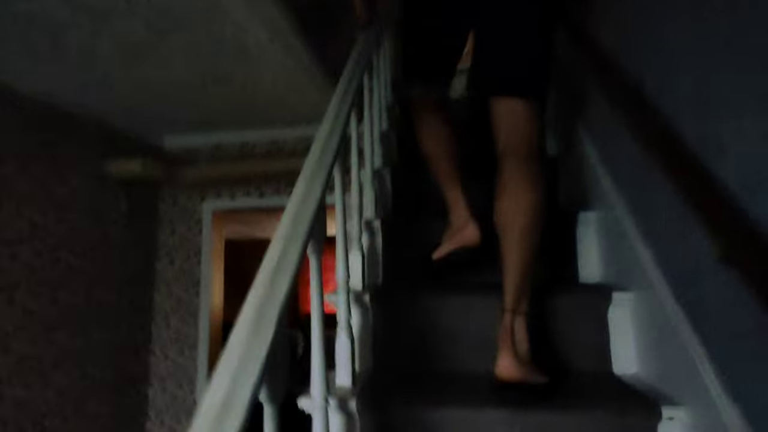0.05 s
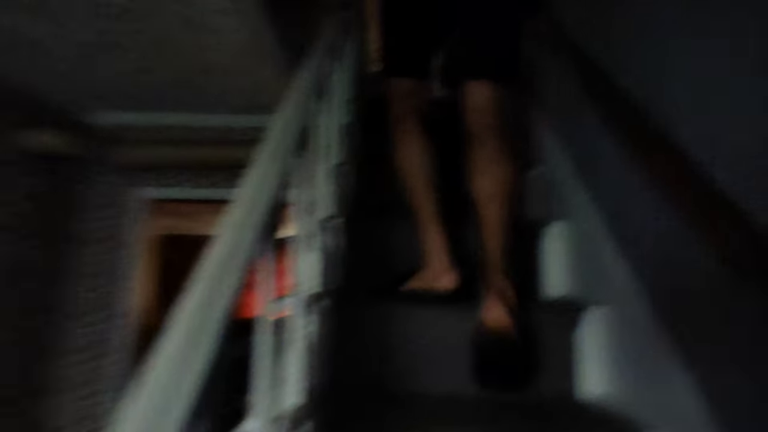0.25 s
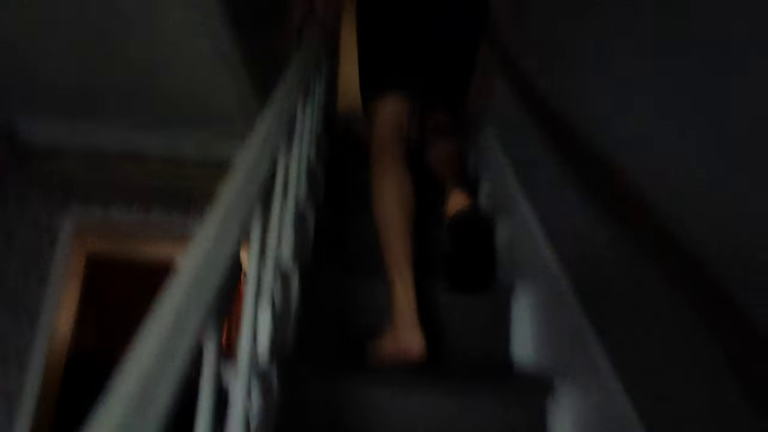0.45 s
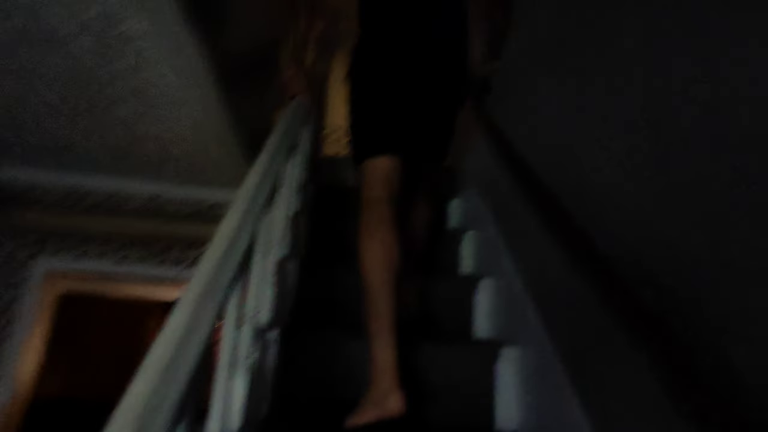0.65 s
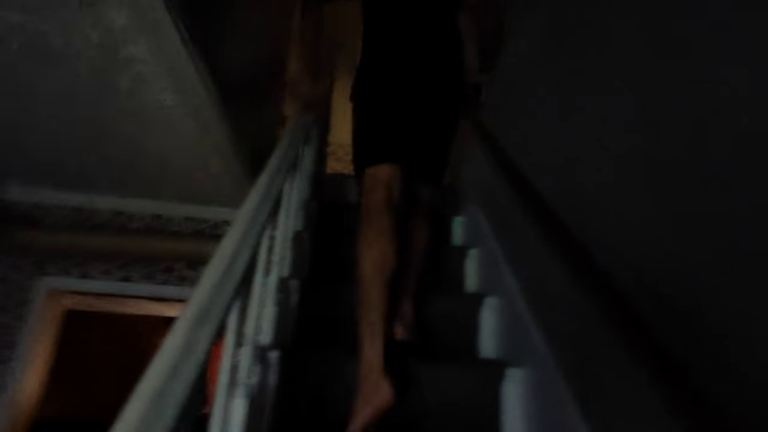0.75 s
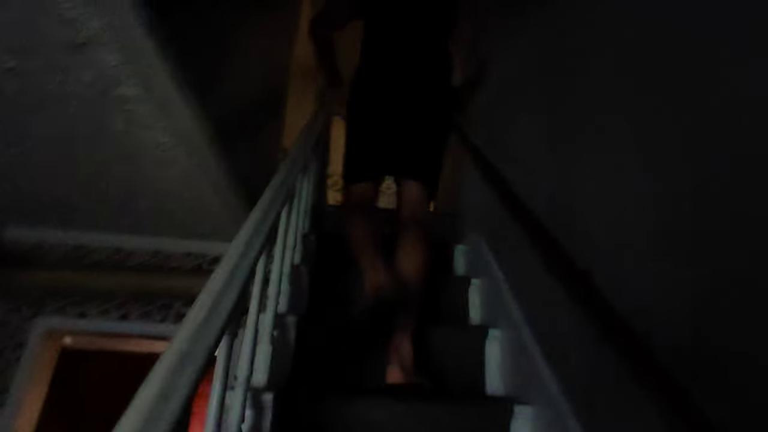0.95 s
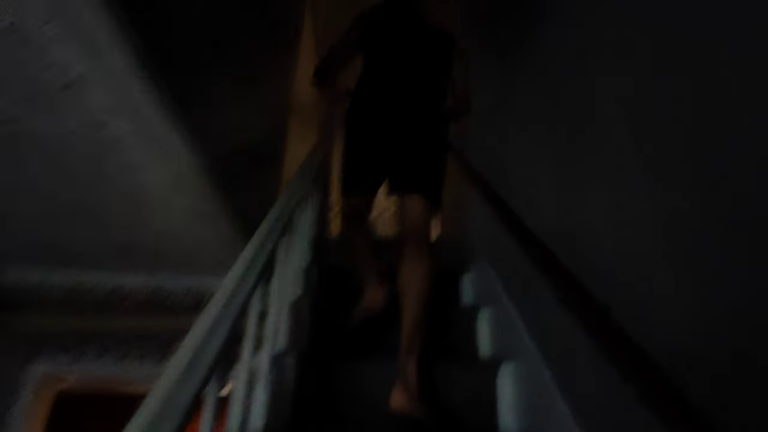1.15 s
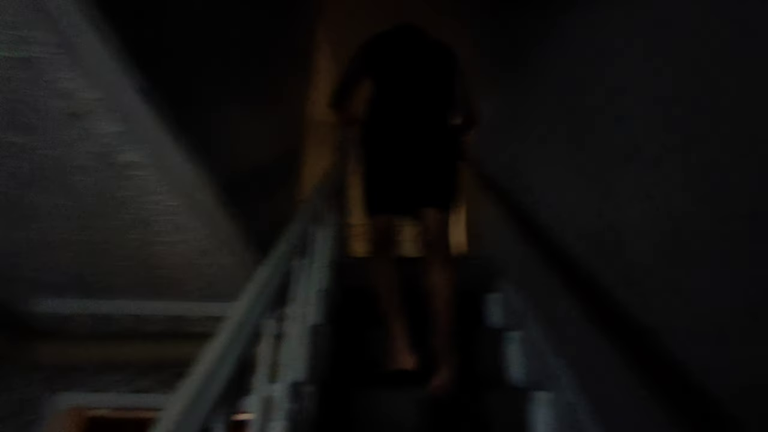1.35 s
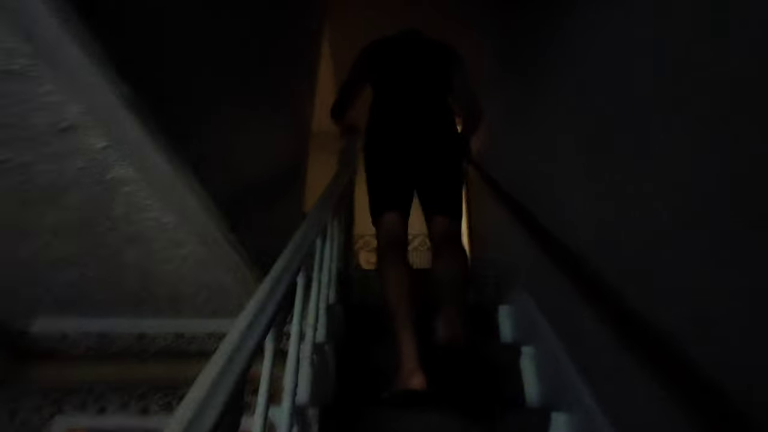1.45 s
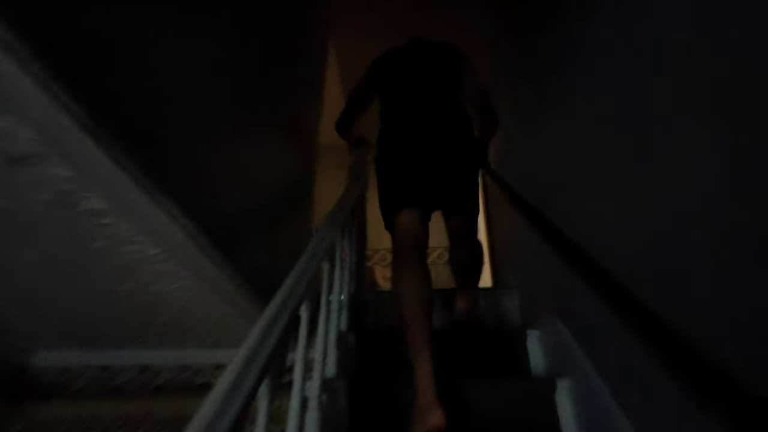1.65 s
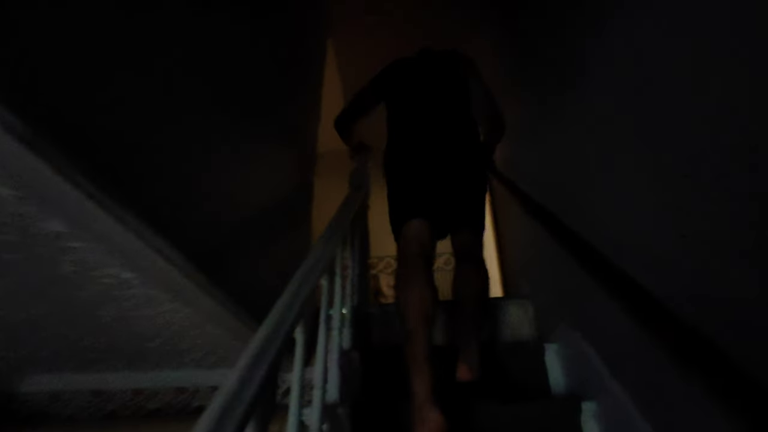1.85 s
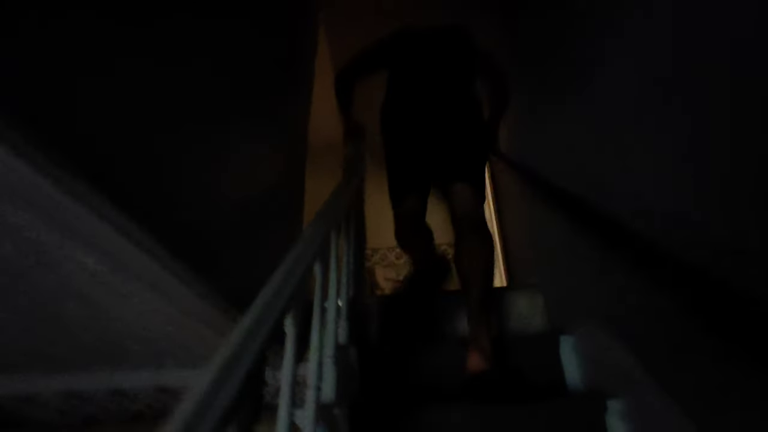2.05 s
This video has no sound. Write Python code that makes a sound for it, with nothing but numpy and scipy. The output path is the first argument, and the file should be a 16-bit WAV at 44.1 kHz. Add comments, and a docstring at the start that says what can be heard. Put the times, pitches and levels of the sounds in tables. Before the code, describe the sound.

Someone walks up a wooden staircase in a quiet house, slippers slapping and scuffing the carpet over dull thumps. About four uneven steps echo slightly, with soft clothing rustle and low bumps on a hand-held microphone.

```python
"""Dull thumps and light slaps: someone climbs carpeted wooden stairs in loose slippers.
Each step shakes the wood, the soles slap the heel or the stair and scuff the carpet,
and the stairwell echoes. Every stride jolts the hand-held microphone into a low rumble.
Clothes rustle over the quiet drone of the house."""
import sys
import numpy as np
from scipy import signal
from scipy.fft import rfft, irfft, next_fast_len
from scipy.io import wavfile

SR = 44100
rng = np.random.default_rng(int(sys.argv[2]) if len(sys.argv) > 2 else 0)


def dump(signal):
    """Clip the signal to [-1, 1] and save it as 16-bit WAV at the path in sys.argv[1]."""
    limited = np.clip(np.atleast_2d(signal).T, -1, 1)
    pcm = np.round(limited * 32767).astype(np.int16)
    wavfile.write(sys.argv[1], SR, pcm)


N = 92610
T = np.arange(int(SR * 0.6)) / SR  # seconds since the start of one short sound


def thumps():
    """A foot bends the stair for a few swings and makes the staircase ring, over a dull thud."""
    # weight landing on a stair: start_s, level_db, pitch_hz, thud_decay_s
    footfalls = [(0.067, -48.5, 189, 0.38), (0.165, -41, 65, 0.17), (.2068, -19, 205.4, 0.15),
                 (0.2193, -25.5, 165, 0.21), (0.306, -37.5, 227, 0.18), (0.46, -38.5, 153, 0.44),
                 (.505, -44.5, 160, 0.41), (0.72, -34.5, 218, 0.37), (0.74, -37.5, 148, 0.19),
                 (0.841, -41, 255, 0.16), (0.861, -52, 100, 0.57), (1.269, -35, 110, 0.65),
                 (1.3079, -20, 149.5, 0.34), (1.338, -29, 147, 0.18), (1.451, -33.5, 218, 0.18),
                 (1.47, -29, 66, 0.33), (1.833, -37, 128, 0.48), (1.917, -38, 121, 0.083),
                 (2.092, -46, 130, 0.14)]
    # the notes the staircase rings at: pitch_hz, level_db, decay_s
    stair_notes = [(61.8, -10, 0.9), (100.5, -10.5, 0.48), (130.4, -7.5, 0.29), (168.3, -1.5, 0.26),
                   (214.7, -2, 0.23), (242.1, -1, 0.29), (358.6, -6, 0.13), (409, -7, 0.48),
                   (473.5, -6.5, 0.2), (527, -5.5, 0.34)]
    # tone of the thud: frequency_hz, level_db
    thud_tone = [(30, -58), (60, -2), (80, -1.5), (110, -2), (150, -5), (250, -1.5), (310, -9.5), (400, -6),
                 (600, -7), (1200, -16), (3000, -60)]
    thud_db, ring_db, bend_db = -5, -6.5, 4
    out = np.zeros((2, N))
    for start_s, level_db, pitch_hz, thud_decay_s in footfalls:
        # sound far from the step's own pitch is weaker
        focus_db = lambda hz: -5.5 * np.log2((hz + 1) / pitch_hz) ** 2
        bend = np.sin(2 * np.pi * pitch_hz * T) * fade(T, decay_s=0.07)
        ring = sum(amp(db + focus_db(hz)) * np.sin(2 * np.pi * hz * T) * fade(T, decay_s)
                   for hz, db, decay_s in stair_notes)
        thud = stairwell(lambda hz: along(thud_tone, hz) + focus_db(hz), thud_decay_s, echo_db=-4)
        thump = amp(thud_db) * thud - amp(ring_db) * ring - amp(bend_db) * bend
        add(out, start_s, amp(level_db) * thump * onset(rise_s=0.0033))
    return out


def slaps():
    """A loose sole cracks brightly on the heel, or hollowly on the stair as it traps air."""
    # sole hits: start_s, level_db, hollow_hz, hollow_db, bright_db, decay_s
    hits = [(.101, -48, 900, 11, -4, 0.0044), (0.1292, -21.5, 2450, 7, 6, 0.012),
            (0.1651, -31, 675, 7.5, 3.5, 0.024), (0.2, -40, 4000, -3, 27, 0.01),
            (.207, -34.5, 430, 4.5, -4, 0.055), (0.219, -32.5, 800, -5, 20, 0.0098),
            (.233, -27.5, 810, 8.5, -3, 0.019), (.2515, -30.5, 5240, 3.5, 5.5, 0.042),
            (0.3295, -37.5, 3000, 4.5, 7.5, .03), (0.376, -42.5, 3040, 2.5, 4.5, 0.06),
            (.4625, -34.5, 643, 12, -31, 0.019), (.5417, -36.5, 2550, 0.5, -32, 0.0062),
            (0.7007, -43.5, 5000, -2, 8, 0.0092), (0.7196, -33.5, 398, -14, -12, 0.023),
            (.822, -37.5, 960, 7.5, 2, 0.036), (.846, -31, 4500, 9, 5, 0.0097),
            (1.2566, -31.5, 2400, 8, 7.5, 0.0087), (1.298, -36, 596, 13, 0.5, 0.043),
            (1.3072, -38, 1720, 6, -3.5, 0.18), (1.358, -36.5, 6000, 1.5, -3, .03),
            (1.4439, -28, 724, 10, -9, 0.053), (1.7768, -45, 930, 4, -18, 0.035),
            (1.8315, -46, 590, 16, -12, 0.11), (1.9127, -38.5, 700, -9, 9, 0.0094),
            (1.9845, -36.5, 2440, 6, 3, 0.0094), (2.0728, -47.5, 990, 8, 4, 0.033)]
    # tone of a slap: frequency_hz, level_db
    slap_tone = [(100, -9), (300, -4.5), (420, 9.5), (560, 4), (750, -2), (1030, 6.5), (1350, 0.5),
                 (2100, -1.5), (2400, -1.5), (2800, -2.5), (3600, -6), (5500, -9.5), (6800, -8.5),
                 (7600, -19.5), (9700, -16), (13000, -25.5), (15500, -20)]
    # where the brightness goes: frequency_hz, share_of_bright_db
    brightness = [(2500, 0), (6000, 0.45), (8500, 0.81), (14000, 1.24)]
    hollow_octaves = 0.44  # half the width of the trapped air's peak
    out = np.zeros((2, N))
    for start_s, level_db, hollow_hz, hollow_db, bright_db, decay_s in hits:
        hollow = lambda hz: np.exp(-(np.log2((hz + 1) / hollow_hz) / hollow_octaves) ** 2)
        tone = lambda hz: along(slap_tone, hz) + hollow_db * hollow(hz) + bright_db * along(brightness, hz)
        slap = stairwell(tone, decay_s, echo_db=4.5)
        add(out, start_s, amp(level_db) * slap * onset(rise_s=0.00084))
    return out


def ticks():
    """A few thin, high ticks sound among the steps."""
    # the ticks: start_s, level_db
    hits = [(.437, -43.5), (1.261, -57), (1.56, -43.5)]
    # tone of a tick: frequency_hz, level_db
    tick_tone = [(3000, -31), (7200, -20), (7700, -6), (8200, 2.5), (8800, -2), (9600, -14), (12200, -11),
                 (13200, -5), (14000, -2), (14600, -4), (15500, -3)]
    out = np.zeros((2, N))
    for start_s, level_db in hits:
        tick = stairwell(lambda hz: along(tick_tone, hz), decay_s=0.038, echo_db=0.5)
        add(out, start_s, amp(level_db) * tick * onset(rise_s=0.0019))
    return out


def scuffs():
    """A sliding sole swells and fades, made grainy by carpet fibres that catch."""
    # slides on the carpet: peak_s, rise_s, decay_s, level_db, body_db
    slides = [(.265, .03, 0.51, -42, 8.5), (0.522, 0.04, 0.43, -75, -11), (.89, 0.069, 0.21, -49, 7),
              (1.345, 0.046, 0.9, -51, 9), (1.755, .04, 0.26, -65, 15), (1.88, .1, 0.72, -52.5, 10.5),
              (1.995, 0.041, 0.16, -48.5, -3)]
    # tone of the rubbing: frequency_hz, level_db
    scuff_tone = [(100, -52), (400, 6.5), (1000, 7), (1500, 11.5), (2700, 6.5), (4000, 6), (5600, -8.5),
                  (6800, 5.5), (7700, -31), (9700, -7.5), (13000, -13), (15500, -9)]
    # the hollow, lower part of the rubbing: frequency_hz, share_of_body_db
    body = [(200, 0.72), (450, 1), (750, 1), (1100, 1), (1500, 0.01)]
    out = np.zeros((2, N))
    for peak_s, rise_s, decay_s, level_db, body_db in slides:
        rub = noise(lambda hz: along(scuff_tone, hz), len(T))
        rub = filtered(rub, lambda hz: amp(body_db * along(body, hz)))
        swell = np.minimum(T / rise_s, 1) * fade(np.maximum(T - rise_s, 0), decay_s)
        add(out, peak_s - rise_s, amp(level_db) * rub * swell)
    grain_db = 2.5 * wobble(per_second=323)
    return out * amp(grain_db)


def stairwell(tone, decay_s, echo_db):
    """A burst of noise fills the stairwell and leaves a short echo."""
    # how long the echo lasts: frequency_hz, decay_s
    echo_decay = [(100, 0.6), (500, 0.32), (2000, 0.32), (6000, .28), (15000, 0.21)]
    fill_s = 0.04
    burst = fade(T, decay_s)
    direct = noise(tone, len(T), likeness=[(200, 0.93), (500, 0.81), (1200, 0.35)]) * burst
    # split fresh noise into bands so that low ones can die away more slowly
    hz, t, bands = signal.stft(noise(tone, len(T)), SR, nperseg=256)
    bands = bands * fade(t, along(echo_decay, hz)[:, None])
    echo = signal.istft(bands, SR, nperseg=256)[1][:, :len(T)]
    build_up = np.sqrt(np.cumsum(burst ** 2) / SR / fill_s) * np.clip(T / 0.0015, 0, 1)
    return direct + amp(echo_db) * echo * build_up


def jolts():
    """Each stride sets off a few very low swings at the microphone."""
    # bumps of the microphone: start_s, level_db, pitch_hz, decay_s
    bumps = [(.17, -40, 26.6, 0.62), (0.236, -24, 28, 0.54), (0.309, -30.5, 31, 0.46),
             (0.501, -45.5, 38.2, 0.9), (0.756, -31, 27.2, 0.7), (0.803, -27.5, 38.3, 0.079),
             (.885, -35, 20.8, 0.34), (1.332, -24, 24.2, 0.56), (1.387, -41, 36.7, 0.25),
             (1.599, -31.5, 24, 0.42), (1.812, -42, 43.4, 0.85), (1.973, -38, 28.6, 0.41)]
    out = np.zeros((2, N))
    for start_s, level_db, pitch_hz, decay_s in bumps:
        swing = -np.sin(2 * np.pi * pitch_hz * T) * fade(T, decay_s)
        add(out, start_s, amp(level_db) * swing * onset(rise_s=0.0038))
    return out


def clothes():
    """Moving cloth makes a soft rustle that swells and flutters."""
    # loudness of the rustle: time_s, level_db
    loudness = [(0, -58), (.1, -56.5), (.4, -59), (.62, -57.5), (.72, -57), (.92, -52.5), (1.0, -67),
                (1.17, -70.5), (1.24, -76.5), (1.4, -52), (1.58, -59.5), (1.68, -61.5), (1.75, -57.5),
                (1.82, -53), (1.98, -53), (2.06, -66), (2.1, -49)]
    # tone of the cloth: frequency_hz, level_db
    cloth_tone = [(60, -10), (250, 12), (500, 14), (1000, 7.5), (1600, 5), (2700, 4), (4500, 1.5),
                  (6800, -3), (7700, -7), (9700, -5), (13000, -14.5), (15500, -8)]
    flutter_db = 1.2 * wobble(per_second=40) + 0.8 * wobble(per_second=500)
    level_db = np.interp(np.arange(N) / SR, *np.transpose(loudness)) + flutter_db
    return amp(level_db) * noise(lambda hz: along(cloth_tone, hz), N)


def house():
    """The house gives a quiet, steady drone."""
    # tone of the drone: frequency_hz, level_db
    drone_tone = [(20, 13), (45, 21), (70, 10), (85, 11), (96, 20), (110, 8.5), (140, 11.5), (170, -1),
                  (200, -5), (238, 16), (290, -5), (480, -1), (1000, -7.5), (3000, -13), (7000, -23),
                  (8000, -34), (15500, -17.5)]
    return amp(-64) * noise(lambda hz: along(drone_tone, hz), N)


def noise(tone, size, likeness=None):
    """Stereo noise of strength 1 (rms); tone gives the decibels at each frequency."""
    # how alike left and right are for sound from all around: frequency_hz, likeness (1 = the same)
    room_likeness = [(150, 0.82), (300, 0.82), (600, 0.58), (1200, -0.16), (2500, 0.061), (8000, -0.082)]
    hz = np.fft.rfftfreq(size, 1 / SR)
    spread = np.arccos(np.clip(along(likeness or room_likeness, hz), -1, 1)) / 2
    spectrum = rfft(rng.standard_normal((2, size))) * amp(tone(hz))
    middle, side = irfft(spectrum * [np.cos(spread), np.sin(spread)], size)
    stereo = np.array([middle + side, middle - side])
    return stereo / np.sqrt(np.mean(stereo ** 2) + 1e-20)


def amp(db):
    """Turn decibels into a multiplier."""
    return 10 ** (np.asarray(db) / 20)


def along(points, hz):
    """Read between (frequency_hz, value) points, with octaves evenly spaced."""
    frequencies, values = np.transpose(points)
    return np.interp(np.log(hz + 1), np.log(frequencies + 1), values)


def onset(rise_s):
    """Rise smoothly from 0 towards 1."""
    return 1 - np.exp(-T / rise_s)


def fade(t, decay_s):
    """Die away by 60 decibels every decay_s seconds."""
    return np.exp(-np.log(1000) * t / np.maximum(decay_s, 1e-3))


def wobble(per_second):
    """A line that wanders between random values."""
    return np.interp(np.arange(N) * per_second / SR, np.arange(4096), rng.standard_normal(4096))


def filtered(sound, gain):
    """Turn each frequency up or down by gain(hz)."""
    size = sound.shape[-1]
    padded = next_fast_len(size + 2048, True)
    hz = np.fft.rfftfreq(padded, 1 / SR)
    return irfft(rfft(sound, padded) * gain(hz), padded)[..., :size]


def add(out, start_s, sound):
    """Mix a sound into out, beginning at start_s."""
    first = max(0, round(start_s * SR))
    part = out[:, first:first + sound.shape[-1]]
    part += sound[..., :part.shape[1]]


def scene():
    """All the sounds together."""
    return thumps() + slaps() + ticks() + scuffs() + jolts() + clothes() + house()


def record(dry):
    """The left microphone picks up more bass, and the very highest treble is cut."""
    # how much louder the left side is: frequency_hz, left_minus_right_db
    balance = [(30, 6), (120, 4.5), (300, 2), (600, 7.5), (1100, 0), (3000, 3.1), (6000, -1.5), (9000, 2.5),
               (14000, -2.5)]
    top_hz = 15900
    sides = np.array([[0.5], [-0.5]])
    return filtered(dry, lambda hz: amp(along(balance, hz) * sides) * (hz < top_hz))


dry = scene()
out = record(dry)
dump(out)
```